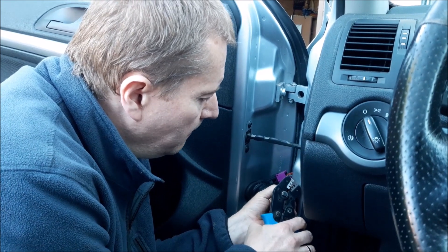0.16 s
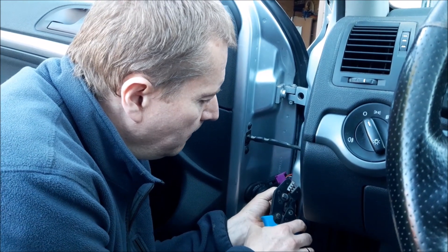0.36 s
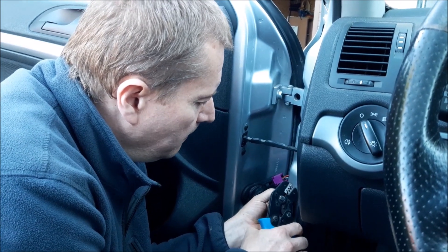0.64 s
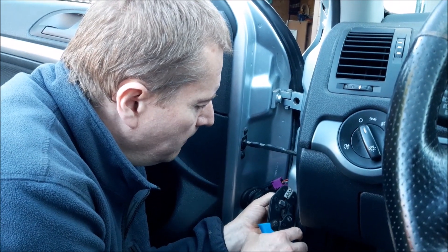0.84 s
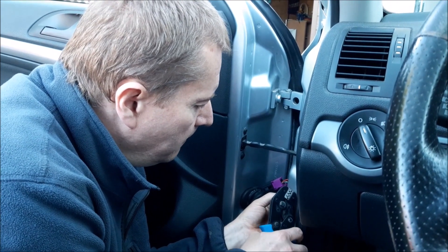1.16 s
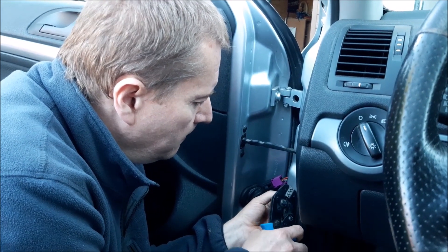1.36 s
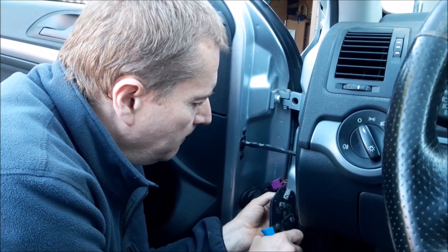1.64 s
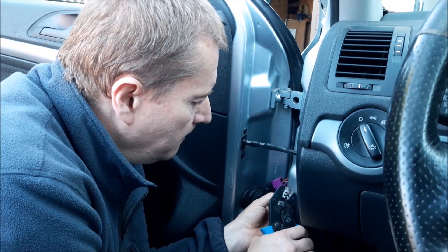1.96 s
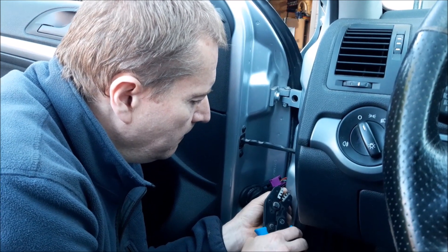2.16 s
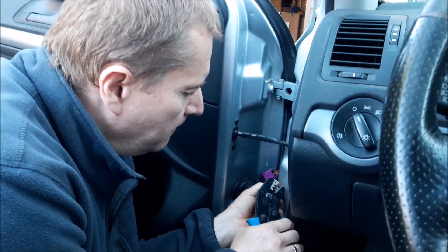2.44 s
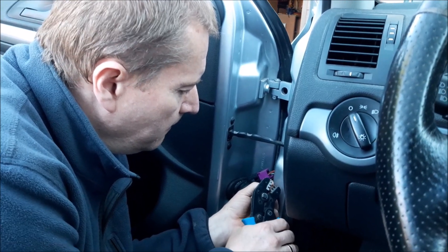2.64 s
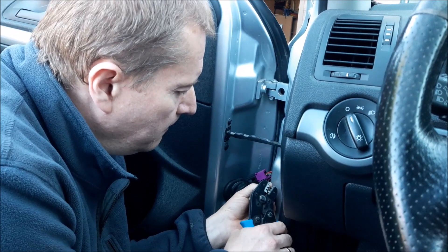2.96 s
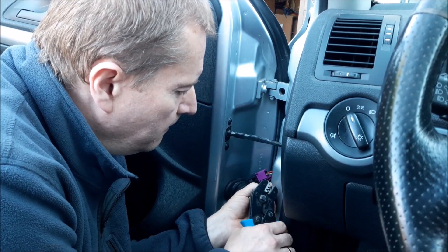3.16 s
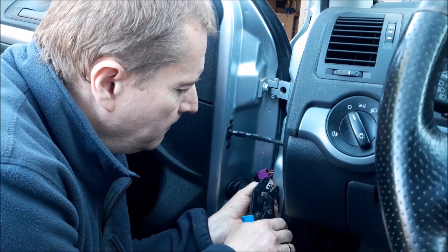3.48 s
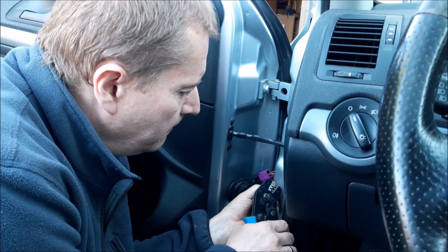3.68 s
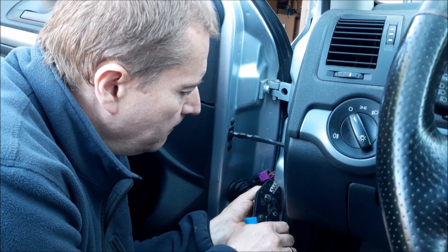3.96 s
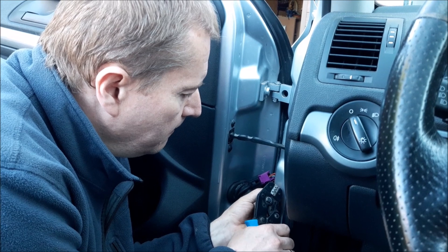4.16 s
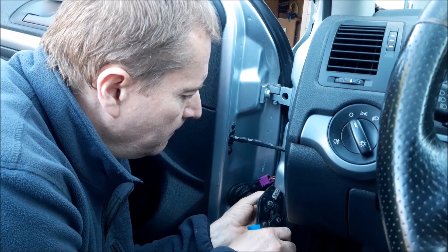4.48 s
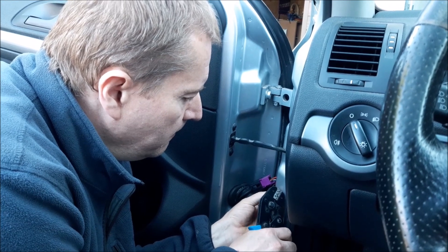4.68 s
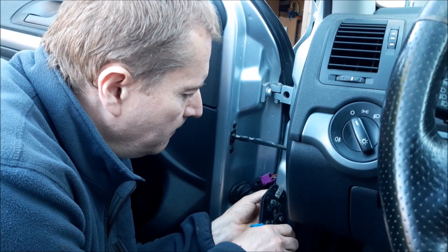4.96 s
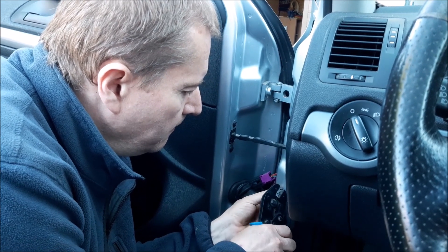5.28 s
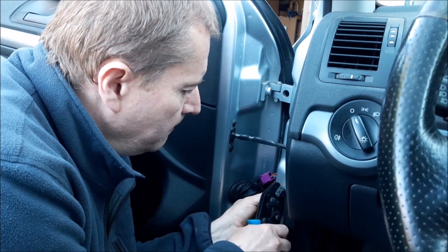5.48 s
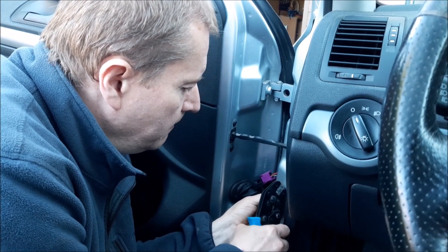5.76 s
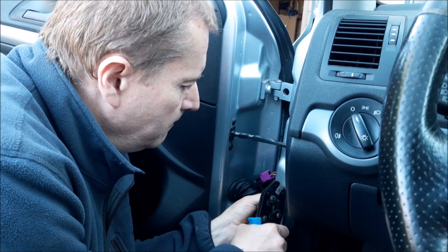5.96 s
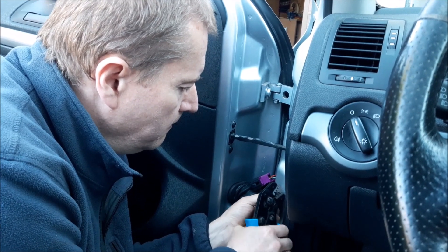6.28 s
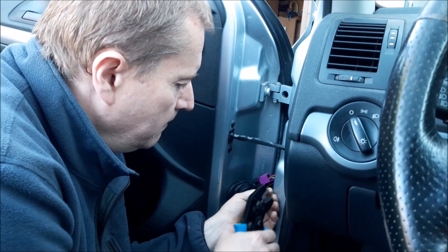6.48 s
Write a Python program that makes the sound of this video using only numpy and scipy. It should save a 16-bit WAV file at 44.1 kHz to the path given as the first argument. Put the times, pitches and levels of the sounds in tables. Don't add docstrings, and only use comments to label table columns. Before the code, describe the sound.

Close microphone, short garage reflections. Hard, dry steel snaps come in three clusters: a longer one at first, tightening into a fast run and a loud release, then four snaps after a pause, then three softer ones and a rattling release. Thin steel ringing and tiny jingles trail them. A hand bumps and rubs plastic trim, fabric brushes, and a distant engine drone gradually recedes.

```python
import sys
import numpy as np
from scipy import signal
from scipy.io import wavfile

SR = 44100
rng = np.random.default_rng(int(sys.argv[2]) if len(sys.argv) > 2 else 0)


def put_to_file(sound):
    columns = np.atleast_2d(sound).T
    safe = np.clip(columns, -1, 1)
    whole_steps = np.round(safe * 32767)
    wavfile.write(sys.argv[1], SR, whole_steps.astype(np.int16))


def field_ratio(decibels):
    return 10 ** (np.asarray(decibels, dtype=float) / 20)


N = 291799

# start in seconds, peak in dB, handle modes in dB, crack in dB,
# upper frame modes in dB.
SNAPS = [(0.61, -11, -7.5, -14, -5), (0.7778, -13, -4, -11.5, -5.5), (1.1653, -11, -3, -14.5, -0.5),
         (1.499, -14, -8, -10.5, -4), (1.557, -13, -7, -9.5, -5.5), (1.6026, -15.5, -10.5, -17.5, -6),
         (1.6457, -16, -1, -22.5, -11), (2.0027, -9, -10, -10.5, -4.5), (3.8789, -16, -3, -12.5, -4.5),
         (4.0128, -17, -3, -10, -4.5), (4.1814, -13.5, -7, -12.5, -1), (4.254, -13, -2.5, -12, 0),
         (5.9234, -16.5, -6, -12.5, -2.5), (6.008, -18.5, -4, -26, 6), (6.0863, -19.5, -2.5, -27, -6)]
# start in seconds, peak in dB, crack in dB,
# chatter t60 in seconds.
RELEASES = [(1.9394, -10.5, -12, 0.036), (1.9471, -9.5, -9, 0.032), (1.9546, -8, -11.5, 0.027),
            (1.9647, -8, -10, .029), (6.3108, -9, -21, 0.042), (6.3161, -20, -16, 0.036),
            (6.3188, -16.5, -7.5, .045), (6.3244, -16, -23, 0.054), (6.329, -10.5, -13.5, 0.04),
            (6.3382, -11.5, -12, 0.038), (6.3444, -29, -20, .027), (6.3567, -17.5, -24.5, 0.022)]
# start in seconds, peak in dB, handle modes in dB,
# chatter t60 in seconds.
GRAZES = [(.269, -47, 0, .04), (0.605, -27.5, -2, 0.048), (1.1316, -24.5, -2, 0.033),
          (1.2633, -34, 10.5, 0.027), (1.498, -32, -26, .02), (1.5536, -19, -11, 0.022),
          (1.597, -23.5, -14, 0.028), (1.9017, -32.5, 0, 0.03), (1.915, -27.5, -4.5, .033),
          (1.9325, -30, -16, 0.039), (1.9987, -23.5, -17, 0.019), (2.0634, -28.5, -4, 0.11),
          (2.1248, -33.5, 9, 0.047), (2.66, -42, -10, .03), (2.948, -40.5, -14, .03),
          (3.022, -39.5, -14.5, .04), (3.312, -45.5, -9, 0.037), (3.8741, -21, -9, 0.056),
          (4.0108, -28.5, -3, 0.021), (4.1766, -19.5, -6, .044), (4.2455, -31.5, -1.5, 0.042),
          (5.916, -38, -8.5, 0.033), (5.998, -30, -18, .068), (6.0661, -46.5, -12, .023),
          (6.2204, -51, -10, .03), (6.2595, -39.5, -5, .048), (6.278, -37.5, -16, 0.034),
          (6.2941, -31, -12, 0.044), (6.3087, -29.5, 2, 0.04)]
# frequency in Hz, width in Hz, level in dB.
HANDLE = [(1490, 200, -8), (1841, 340, -8.5), (2155, 150, -0.5), (2770, 250, -13)]
# frequency in Hz, width in Hz, level in dB.
FRAME_LOW = [(3088, 200, -4.5), (3540, 220, -1.5), (3910, 450, 0), (4494, 310, 3.5), (5370, 290, -6)]
# frequency in Hz, width in Hz, level in dB.
FRAME_HIGH = [(5250, 370, -8.5), (5640, 320, 2.5), (6455, 450, 5), (7270, 400, -1), (7460, 200, -1)]
# start in seconds, length in seconds,
# upper mode in dB, lower mode in dB.
JAW_RINGS = [(0.618, 0.18, -50, -43.5), (0.785, .2, -47, -42.5), (1.171, 0.15, -44.5, -45),
             (1.504, 0.054, -39, -62.5), (1.558, 0.057, -35, -58), (1.967, 0.026, -54.5, -43),
             (2.007, .035, -55, -63), (3.887, 0.13, -70, -50.5), (4.034, 0.11, -48.5, -50.5),
             (4.192, 0.11, -61, -53), (4.251, 0.21, -35, -50), (5.929, 0.069, -41.5, -48),
             (6.36, .15, -60, -63)]
JAW_HZ = [4447, 3601]
JAW_T60_S = [.36, .26]
# start in seconds, level in dB, then the three modes that the grip
# leaves free in Hz, strongest first.
JINGLES = [(.354, -56, 4530, 3605, 5655), (.418, -52, 4530, 3605, 9700), (.489, -48, 4530, 6918, 3605),
           (.570, -51, 3605, 6918, 5922), (3.022, -52, 4280, 6385, 3605), (3.04, -52, 4280, 6015, 4530),
           (3.314, -52, 5835, 6385, 5180), (3.335, -51, 5835, 4530, 7092), (3.708, -66, 5655, 9700, 6015),
           (3.757, -52, 6385, 5655, 3605), (3.775, -54, 4280, 5285, 3605), (3.814, -49, 6015, 4280, 6560),
           (3.885, -59, 5655, 6385, 6015), (4.02, -60, 5655, 6385, 4530), (4.26, -56, 4530, 5285, 7092),
           (6.012, -63, 5835, 6385, 7092), (6.359, -49, 5180, 6918, 7092)]
LOOSE_HZ = [3605, 4280, 4530, 5180, 5285, 5655, 5835, 5922, 6015, 6385, 6560, 6918, 7092, 9700]
# start in seconds, level in dB, lowest mode in Hz, t60 in seconds,
# contact in seconds.
KNOCKS = [
    (1.049, -41, 1510, 0.025, 0.0043),
    (1.536, -23.5, 319.4, 0.097, 0.014),
    (1.644, -28, 540, 0.022, .0012),
    (2.776, -36.5, 748, 0.092, 0.0034),
    (4.59, -43, 676, 0.12, 0.025),
    (4.91, -47, 310, 0.086, 0.026),
    (6.085, -33, 520, 0.028, 0.0012),
    (.267, -39, 757, 0.077, 0.0034),
    (2.127, -38, 1060, 0.037, 0.0033),
]
# start in seconds, rise in seconds, length in seconds, level in dB,
# highest pitch in Hz.
RUBS = [
    (0.264, 0.0033, 0.3, -50, 3760),
    (2.765, 0.0057, 0.11, -44.5, 2200),
    (3.654, 0.046, 0.06, -48, 1500),
    (4.582, 0.012, 0.24, -56.5, 1860),
    (4.852, 0.0096, 0.21, -57.5, 1885),
]
# start in seconds, rise in seconds, length in seconds, level in dB,
# lowest pitch in Hz.
SWISHES = [
    (2.033, 0.14, 0.51, -69.5, 8360),
    (2.101, 0.12, .25, -50.5, 4900),
    (2.73, .04, 0.49, -52.5, 4900),
    (3.644, 0.058, .15, -67, 3800),
]
# time in seconds, level in dB.
SLEEVE = [(0.0, -71), (0.29, -72), (0.46, -62.5), (1.0, -62.5), (1.2, -55.5), (1.55, -61), (1.66, -58.5),
          (1.99, -52.5), (2.71, -59.5), (3.17, -68.5), (3.39, -74), (4.13, -70.5), (4.42, -82), (5.77, -88),
          (6.19, -81.5), (6.62, -83)]
# time in seconds, level in dB.
ENGINE = [(0.0, -56.5), (0.02, -53.5), (0.59, -47), (0.77, -52.5), (0.9, -46), (1.36, -49), (1.81, -45),
          (1.84, -56), (1.95, -46.5), (2.69, -46.5), (3.32, -46), (3.61, -50.5), (3.93, -43), (4.0, -55.5),
          (4.4, -45), (4.44, -54.5), (6.28, -58), (6.62, -58)]
# time in seconds, level in dB.
EXHAUST = [(0.0, -58.5), (0.83, -54.5), (1.0, -49), (1.4, -54.5), (1.92, -50), (2.06, -52.5), (3.09, -51.5),
           (4.75, -69.5), (6.62, -73.5)]
# time in seconds, level in dB.
PASS = [(0.0, -56), (0.22, -56), (0.4, -52), (0.96, -54), (1.12, -50), (1.95, -45), (2.28, -47.5),
        (3.08, -55.5), (4.48, -59.5), (5.67, -70), (6.25, -68.5), (6.62, -73)]
# frequency in Hz, then shares from 0 to 1 of engine, exhaust,
# nearness and sleeve.
REACH = [(90, 0.82, .01, .05, .01), (301.8, .1, 0.82, 0.056, .01), (750, .01, .05, .9, .1),
         (1590, .01, .01, 0.82, .1), (3020, .01, .01, 0.059, 0.96), (6500, .01, .01, 0.42, 0.37),
         (10810, .01, .01, .05, 0.54), (14000, .01, .01, .01, .05)]
# frequency in Hz, level in dB per Hz.
OUTSIDE = [(15, -56), (28, -14.5), (76, 5.5), (135, -8), (304, -11.5), (510, -16.5), (651, -16),
           (1800, -23.5), (2500, -29), (4730, -31), (6730, -33), (8800, -54), (14500, -47), (16500, -77)]
# frequency in Hz, width in Hz, level in dB.
BOOM = [(316, 26, -65.5), (650, 97, -66.5), (806, 19, -75), (1168, 90, -71.5), (1460, 80, -73.5)]
# frequency in Hz, width in Hz, level in dB.
PORT_PEAK = [(6820, 570, 4)]


def ratchet():
    out, t = np.zeros(N), np.arange(2500) / SR
    touches = contacts()
    grit = rng.standard_normal((len(touches), 3, len(t)))
    for (s, db, handle_db, crack_db, t60, upper_db), (sizes, lumps, hiss) in zip(touches, grit):
        fall = field_ratio(-60 * t / max(t60, 0.004)) * np.minimum(t / 0.0011, 1)
        first_blow = 3.0 * field_ratio(-60 * t / 0.0018) * np.minimum(t / 0.0006, 1)
        chatter = sizes * field_ratio(6.25 * lumps) * (fall + first_blow)
        frame = resonate(chatter, FRAME_LOW) + field_ratio(upper_db) * resonate(chatter, FRAME_HIGH)
        snap = band(frame, 2900, 9000) + field_ratio(handle_db) * resonate(chatter, HANDLE)
        crack = band(hiss * fall ** 1.1, 7600, 15800)
        add(out, s - 0.0008, field_ratio(db) * (snap / np.max(np.abs(snap)) + field_ratio(crack_db) * crack))
    no_bass = signal.butter(7, 1400, "high", fs=SR, output="sos")
    return signal.sosfilt(no_bass, out)


def contacts():
    drops = [(s, db, handle_db, crack_db, 0.029, upper_db)
             for s, db, handle_db, crack_db, upper_db in SNAPS]
    bounces = [(s + 0.0055, db - 22, 4.5, -16, 0.16, 0) for s, db, *_ in SNAPS]
    rattle = [(s, db, -5, crack_db, t60, -0.5) for s, db, crack_db, t60 in RELEASES]
    grazes = [(s, db, handle_db, -28.5, t60, -5) for s, db, handle_db, t60 in GRAZES]
    return drops + bounces + rattle + grazes


def jaw():
    out, hz, t60 = np.zeros(N), np.array(JAW_HZ), np.array(JAW_T60_S)
    for s, lasts, *levels_db in JAW_RINGS:
        tone = struck(hz, field_ratio(np.array(levels_db)), t60, lasts, split_hz=np.array([6.0, 28.0]))
        t = np.arange(len(tone)) / SR
        swell_in = np.minimum(t / 0.01, 1)
        stop = np.minimum((lasts - t) / (0.12 * lasts), 1)
        add(out, s, tone * swell_in * stop)
    return out


def jingle():
    out, hz = np.zeros(N), np.array(LOOSE_HZ)
    thin = hz > 9000
    chance = rng.random((len(JINGLES), 3, len(hz)))
    for (s, db, *free_hz), (pitch, size, split) in zip(JINGLES, chance):
        steps_db = -12 - 7.0 * pitch
        steps_db[np.searchsorted(hz, free_hz)] = [0, -2, -4]
        t60 = 0.21 * np.where(thin, 0.4, 0.9 + 0.6 * size)
        tone = struck(hz, field_ratio(db + steps_db - 8.0 * thin), t60, 0.4, split_hz=15 + 30 * split)
        spray = struck(3300 + 4200 * pitch, field_ratio(db - 13 - 6 * size), 0.1, 0.4)
        rise = np.minimum(np.arange(len(tone)) / SR / 0.003, 1)
        add(out, s, (tone + spray) * rise)
    return out


def knocks():
    out, ratios = np.zeros(N), np.array([1, 1.13, 1.55, 1.9, 2.4, 3.1])
    rough = rng.standard_normal((len(KNOCKS), 5000))
    for (s, db, hz, t60, contact), grit in zip(KNOCKS, rough):
        tilt_db = -7 - 330 * contact
        gains = field_ratio(tilt_db * np.arange(len(ratios)))
        body = struck(hz * ratios, gains, t60 / np.sqrt(ratios), 0.15)
        touch = int(np.clip(contact * SR, 20, len(grit)))
        push = grit[:touch] * np.hanning(touch)
        thud = band(np.convolve(body, push), 1.05 * hz, 2.2 * hz)
        add(out, s, field_ratio(db) * thud / np.max(np.abs(thud)))
    return out


def rubs():
    knuckle = [(s, rise, lasts, db, 550, high_hz) for s, rise, lasts, db, high_hz in RUBS]
    cuff = [(s, rise, lasts, db, low_hz, 1.47 * low_hz) for s, rise, lasts, db, low_hz in SWISHES]
    strokes = knuckle + cuff
    out, grit = np.zeros(N), rng.standard_normal((len(strokes), SR // 2))
    t = np.arange(SR // 2) / SR
    for (s, rise, lasts, db, low_hz, high_hz), hiss in zip(strokes, grit):
        trail = field_ratio(-20 * np.maximum(t - rise, 0) / lasts)
        shape = np.minimum(t / rise, 1) * trail * np.minimum((0.5 - t) / 0.1, 1)
        friction = band(band(hiss, low_hz, high_hz), low_hz, high_hz)
        add(out, s, field_ratio(db) * rms_one(friction) * shape)
    return out


def room(x):
    t = np.arange(int(0.3 * SR)) / SR
    decay = field_ratio(-60 * t / 0.17)
    tail = rng.standard_normal(len(t)) * decay * np.clip((t - 0.003) / 0.004, 0, 1)
    tail = signal.lfilter([1, -0.6], [1], tail)
    return field_ratio(-20.5) * signal.fftconvolve(x, tail / np.sqrt(np.sum(tail ** 2)))[:N]


def traffic():
    swells_db = np.array([swell(ENGINE), swell(EXHAUST), swell(PASS), swell(SLEEVE)])
    reach_hz, *follows = np.transpose(REACH)
    spectrum_hz, spectrum_db = np.transpose(OUTSIDE)
    edges = 22 * 2 ** np.arange(0, 9.8, 0.25)
    white, together = rng.standard_normal((2, N + SR // 2)), drift(2.7)
    port_hz = 7600
    below, above = np.zeros(N), np.zeros(N)
    for k, (low, high) in enumerate(zip(edges, edges[1:])):
        place = np.log(low * high) / 2
        shares = np.array([np.interp(place, np.log(reach_hz), share) for share in follows])
        smooth = 0.45 if low > 2400 else 1
        patch_db = (0.94 * together + 2.3 * drift(8.3)) * smooth
        level_db = np.interp(place, np.log(spectrum_hz), spectrum_db) + shares @ swells_db + patch_db
        steady = band(white[k % 2], low, high)[-N:]
        add(above if low > port_hz else below, 0, steady * field_ratio(level_db))
    port = signal.cheby1(5, 0.5, port_hz, fs=SR, output="sos")
    through_port = signal.sosfilt(port, below + resonate(below, PORT_PEAK))
    out = field_ratio(-45.5) * rms_one(above + through_port)
    for hz, width, db in BOOM:
        boom = band(rng.standard_normal(N), hz - width / 2, hz + width / 2)
        follow_db = swells_db[1 if hz < 500 else 2]
        out += field_ratio(db + follow_db + 2.2 * drift(3.0)) * rms_one(boom)
    return out


def swell(rows):
    s, db = np.transpose(rows)
    curve = np.interp(np.arange(N) / SR, s, db)
    return curve - np.mean(curve)


def drift(rate):
    r = np.exp(-80 * np.pi * rate / SR)
    slow = signal.lfilter([1], [1, -2 * r, r * r], rng.standard_normal(N // 40 + 2002))[2000:]
    return np.interp(np.arange(N) / 40, np.arange(len(slow)), rms_one(slow))


def struck(hz, gains, t60, lasts, split_hz=0.0):
    t = np.arange(int(lasts * SR))[:, None] / SR
    beat = 1 - 0.12 * np.sin(np.pi * split_hz * t) ** 2
    decay = field_ratio(-60 * t / np.maximum(t60, 0.002))
    return (decay * beat * np.sin(2 * np.pi * hz * t)) @ gains


def resonate(x, peaks):
    out = 0
    for k, (hz, width, db) in enumerate(peaks):
        r = np.exp(-np.pi * width / SR)
        poles = [1, -2 * r * np.cos(2 * np.pi * hz / SR), r * r]
        out = out + (-1) ** k * field_ratio(db) * signal.lfilter([1 - r, 0, r - 1], poles, x)
    return out


def band(x, low_hz, high_hz):
    edges = [low_hz, min(high_hz, 0.46 * SR)]
    return signal.sosfilt(signal.butter(2, edges, "band", fs=SR, output="sos"), x)


def rms_one(x):
    return x / np.sqrt(np.mean(x ** 2) + 1e-20)


def add(out, s, sound):
    at = round(s * SR)
    out[at:at + len(sound)] += sound[:N - at]


def scene():
    near = ratchet() + jaw() + jingle() + knocks() + rubs()
    return (near + room(near) + traffic())[None]


def band_limit(x):
    return signal.sosfilt(signal.butter(12, 16980, fs=SR, output="sos"), x)


def record(dry):
    top_cut = signal.cheby2(10, 50, 16850, fs=SR, output="sos")
    mix = signal.sosfilt(top_cut, dry)
    return band_limit(mix)


dry = scene()
out = record(dry)
put_to_file(out)
```